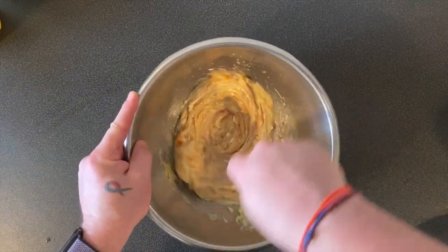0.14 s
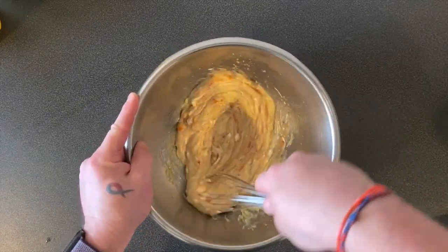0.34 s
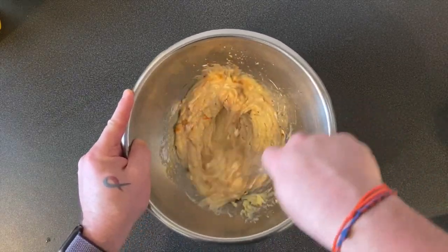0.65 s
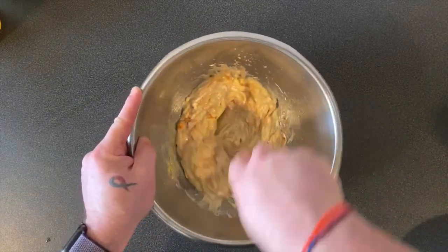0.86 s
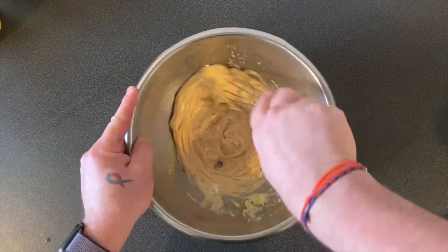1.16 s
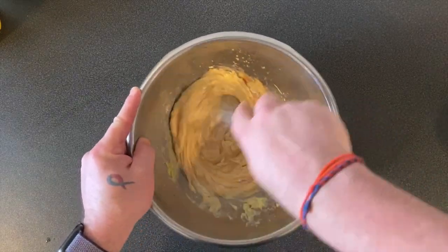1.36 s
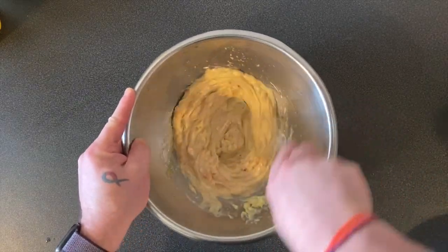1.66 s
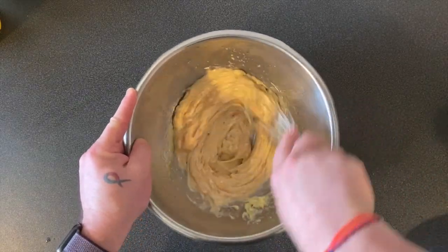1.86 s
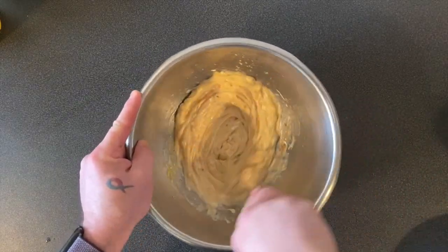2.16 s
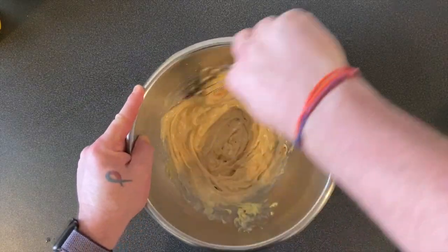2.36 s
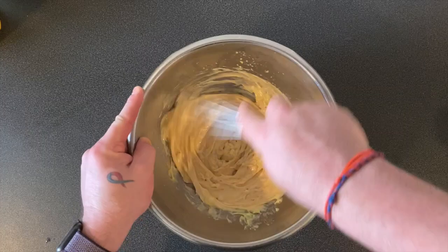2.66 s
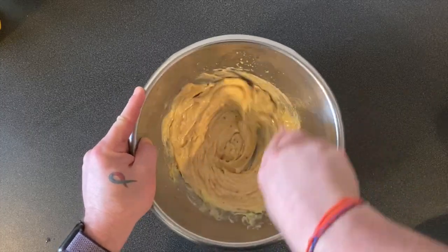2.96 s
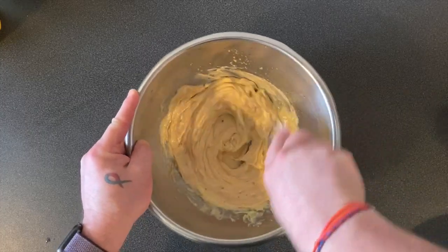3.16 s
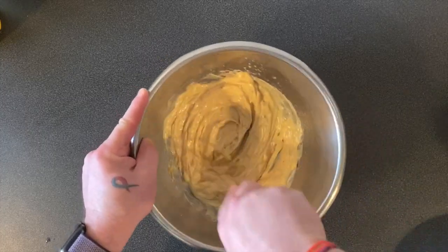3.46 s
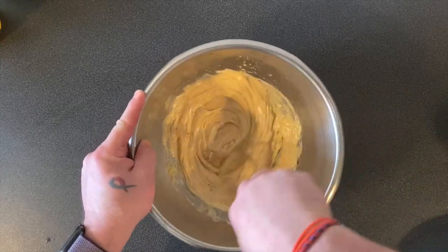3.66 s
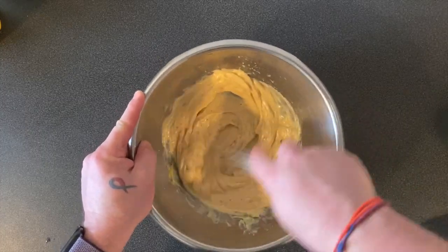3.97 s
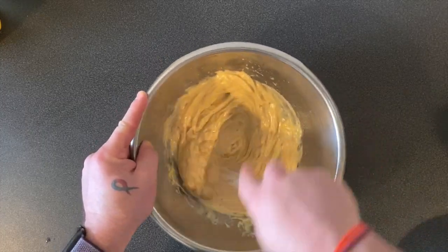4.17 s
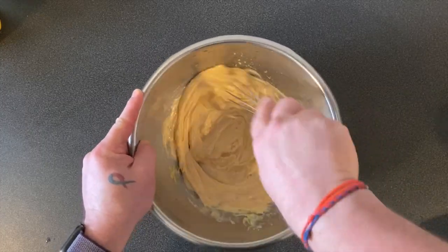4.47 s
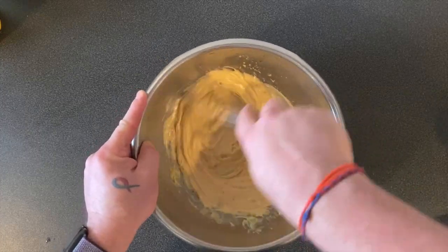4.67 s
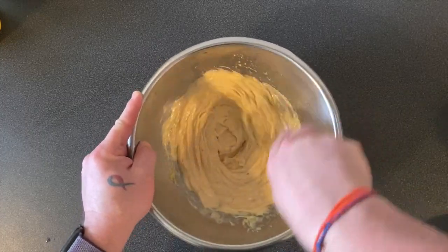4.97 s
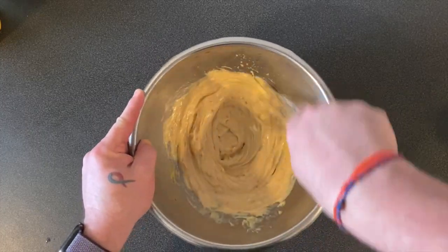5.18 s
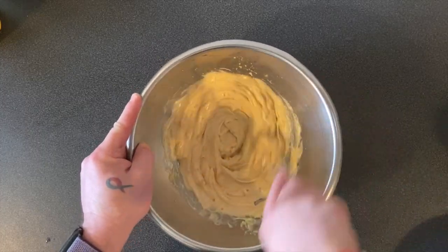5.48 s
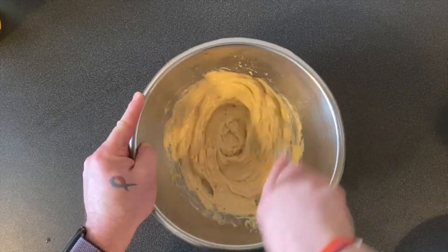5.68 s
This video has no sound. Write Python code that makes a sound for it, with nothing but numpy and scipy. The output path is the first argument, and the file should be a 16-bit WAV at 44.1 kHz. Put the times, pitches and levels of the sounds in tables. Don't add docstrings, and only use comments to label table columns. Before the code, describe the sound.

A wire whisk beats thick sauce in a thin stainless bowl, heard very close in stereo in a small kitchen with short soft reflections. It is under way from the start: bright, gritty swishes about four a second, each a burst of tiny wire clicks, a brief metallic scrape and a quick dip as the wires lift. Strokes are moderate until 1.5 seconds, then harder at 1.6 and 1.85. From about 2.3 to 2.6 only light scraping and small ticks remain; a sharp double clatter with a low thump hits at 2.7, followed by strong strokes at 2.95 and 3.15. Lighter grazes fill 3.4 to 3.8, then two hard strokes come at 4.0 and 4.25. Softer scrapes follow, one hard stroke at 5.15, and gentler ones until the cut near 5.8. Throughout, the damped bowl clanks shortly, sauce rubs dully, and the foot bumps the worktop.

```python
import sys
import numpy as np
from scipy import signal
from scipy.fft import rfft, irfft, next_fast_len
from scipy.io import wavfile

SR = 44100
rng = np.random.default_rng(int(sys.argv[2]) if len(sys.argv) > 2 else 0)


def master(y):
    cut = np.clip(np.atleast_2d(y).T, -1, 1)
    pcm = np.round(cut * 32767)
    wavfile.write(sys.argv[1], SR, pcm.astype(np.int16))


def field_ratio(decibels):
    return 10 ** (np.asarray(decibels, dtype=float) / 20)


N = 257014

# (time [s], wire pressure on the wall [dB], load on the worktop [dB])
STIRRING = [(0.0, -44.5, -51), (0.23, -39.5, -36), (0.47, -37.5, -59), (0.71, -68, -46.5),
            (0.99, -55.5, -49.5), (1.12, -35.5, -46), (1.64, -59.5, -44), (1.89, -47, -41.5),
            (2.38, -36.5, -52), (2.85, -47.5, -46.5), (2.98, -46, -42), (3.21, -40.5, -41.5),
            (3.78, -42.5, -46.5), (4.15, -54, -41), (4.43, -40, -48), (4.9, -44.5, -44),
            (5.2, -46.5, -49.5), (5.82, -43, -44.5)]
# (time [s], low-band lift [dB])
FLATNESS = [(0, 2.5), (0.35, -8), (0.8, 10), (1.15, 3), (1.5, 3), (2.0, 9), (2.5, -10), (2.85, 4), (3.3, 0),
            (3.55, 5.5), (3.9, 6.5), (4.3, 4), (4.6, 6), (5.0, 3), (5.35, 4), (5.6, 11), (5.83, 5.5)]
# (time [s], peak [dB], top octave re peak [dB], struck wall mode [Hz], chatter T60 [s])
LANDINGS = [(0.2192, -11, -7, 2700, 0.1), (0.4193, -9, -7, 7350, 0.09), (0.5511, -11, -7.5, 5630, 0.079),
            (0.7058, -15.5, -6, 7100, 0.17), (0.9427, -15, -3.5, 6460, 0.14),
            (1.1715, -13, -7, 6600, 0.067), (1.4064, -12.5, -5, 6700, 0.15),
            (1.6259, -6.5, -6.5, 6700, 0.13), (1.8481, -3.5, -7.5, 4080, 0.084),
            (2.077, -11.5, -4.5, 6800, 0.16), (2.229, -12.5, -12, 6800, 0.029),
            (2.3334, -18, -3, 6150, 0.4), (2.6903, -7, -1.5, 5700, 0.071), (2.9473, -5, -8.5, 6630, 0.1),
            (3.149, -2.5, -10, 5940, 0.09), (3.3702, -16.5, -8, 6600, 0.12), (3.8086, -14, -4, 6650, 0.19),
            (4.0179, -5, -6.5, 4800, 0.1), (4.237, -4.5, -6.5, 5230, 0.086), (4.703, -19, -3, 7200, 0.071),
            (4.927, -15, -5, 3150, 0.13), (5.1544, -5, -6, 6470, 0.12), (5.4306, -18, -4.5, 3280, 0.13),
            (5.653, -18, -2.5, 3200, 0.18)]
# (time [s], peak [dB], struck wall mode [Hz], chatter T60 [s])
LEADS = [(0.208, -21, 4950, 0.2), (0.41, -21.5, 2680, 0.12), (0.55, -42, 5700, 0.13),
         (0.694, -24.5, 3760, 0.13), (0.9264, -23.5, 7200, 0.071), (1.153, -30, 6540, 0.52),
         (1.382, -23.5, 6950, 0.13), (1.6161, -7.5, 4700, 0.041), (1.842, -12.5, 4200, 0.033),
         (2.066, -19, 5470, 0.033), (2.198, -22, 6260, 0.042), (2.309, -27.5, 6700, 0.42),
         (2.93, -17.5, 4100, 0.034), (3.14, -21, 3900, 0.094), (3.7868, -22.5, 5960, 0.13),
         (4.0108, -12.5, 4700, 0.088), (4.2293, -14.5, 5100, 0.052), (4.682, -28, 4370, 0.33),
         (4.906, -28, 4670, 0.24), (5.1447, -15, 5100, 0.058), (5.4125, -31, 7540, 1)]
# (time [s], peak [dB], struck wall mode [Hz], chatter T60 [s])
GRAZES = [(0.002, -17, 6700, 0.19), (0.346, -24.5, 6200, 0.12), (0.394, -25.5, 3900, 0.042),
          (0.542, -20, 4070, 0.06), (1.312, -28.5, 7460, 0.39), (1.854, -8.5, 6900, 0.1),
          (2.488, -27, 6700, 0.65), (2.548, -25, 6900, 0.12), (2.637, -27.5, 4200, 0.085),
          (2.697, -7.5, 800, 0.13), (2.71, -7.5, 6000, 0.12), (2.7277, -15.5, 6840, 0.23),
          (2.774, -29, 6000, 0.054), (3.3774, -32, 6260, 0.55), (3.44, -23, 2630, 0.18),
          (3.486, -17.5, 5270, 0.03), (3.594, -25.5, 3200, 0.12), (3.668, -26.5, 4900, 0.17),
          (3.716, -22, 5600, 0.054), (3.745, -21.5, 6100, 0.038), (4.016, -10.5, 1840, 0.035),
          (4.372, -26, 3820, 0.27), (4.483, -27, 3040, 0.058), (4.537, -29.5, 4200, 0.18),
          (4.7643, -31, 4800, 0.29), (4.79, -21.5, 3040, 0.079), (5.6111, -37, 5000, 0.26),
          (5.806, -24.5, 6500, 0.057)]
# (time [s], peak [dB])
TICKS = [(0.9951, -24), (1.1109, -26), (2.621, -16), (4.6693, -22), (5.6324, -20), (1.5744, -40),
         (2.896, -35.5), (3.3105, -28), (3.4187, -17), (3.5669, -37), (4.4165, -33), (4.4367, -27),
         (4.6024, -19), (4.8245, -30), (4.875, -25), (5.7484, -27), (5.7883, -38)]
# (frequency [Hz], density [dB per Hz])
SCRAPE_COLOUR = [(1500, -18), (2300, -22.5), (3150, -11.5), (3500, -12), (4200, -11.5), (5000, -7.5),
                 (5550, -10.5), (6300, -7.5), (6900, -9.5), (7600, -5.5), (9000, -5), (12000, -11),
                 (14800, -4), (16500, 0)]
SHEEN_MODES = [2585, 2833, 3170, 3740, 3910, 4280, 4470, 5120, 5270, 5600, 6140, 5840, 6450, 6100, 6530,
               6700, 6860, 6470, 7100]
# (frequency [Hz], level [dB], T60 [s])
WIRE_MODES = [(3074, -26, 0.018), (4700, -37.5, 0.0029), (5100, -17, 0.0029), (6150, -12.5, 0.003),
              (6700, -15, 0.003)]
# (frequency [Hz], level [dB], T60 [s])
CLANK_MODES = [(1829, 0, 0.057), (2690, -11, 0.031), (3146, -1.5, 0.025), (4200, -2, 0.014),
               (4950, -12, 0.014)]
# (time [s], peak [dB], thump re peak [dB], height up the wall [0-1], T60 [s])
KNOCKS = [(0, -29.5, 1.5, 1, 0.063), (0.213, -25.5, -6, 0.9, 0.053), (0.41, -31.5, -6, 0.6, 0.12),
          (0.549, -20, -11, 0.43, 0.048), (0.708, -22.5, -15, 0.4, 0.052), (0.931, -30.5, 0, 0.62, 0.12),
          (1.171, -26, -7.5, 0.6, 0.026), (1.408, -24, -8, 1, 0.015), (1.622, -23.5, -4.5, 0.92, 0.044),
          (1.852, -12, -18.5, 0, 0.026), (2.078, -21, -8.5, 0.58, 0.062), (2.312, -38.5, -2.5, 0.54, 0.11),
          (2.697, -25.5, 3.5, 0.63, 0.043), (2.949, -19.5, -9.5, 0.26, 0.06),
          (3.148, -14.5, -5.5, 0.5, 0.031), (3.372, -26, -5.5, 0.76, 0.033),
          (3.784, -20.5, -11, 0.64, 0.037), (4.013, -14.5, -11.5, 0.7, 0.037),
          (4.239, -14.5, -12, 0.9, 0.029), (4.708, -26, -3.5, 0.94, 0.023), (4.929, -28, 0, 0.97, 0.03),
          (5.154, -15.5, -11, 0.72, 0.042), (5.432, -24.5, -10, 0.58, 0.041), (5.654, -29, -1, 0.85, 0.05)]
# (time [s], peak [dB], thump re peak [dB], height up the wall [0-1])
NUDGES = [(0.999, -46, -19, 0.1), (1.071, -36.5, -6, 0.7), (1.339, -43, -13, 0.4), (1.603, -23, -17, 0.04),
          (2.001, -44, 0.3, 0.8), (2.23, -37.5, -25, 0.85), (2.895, -28.5, -22, 0.24),
          (3.225, -31.5, -5, 0.3), (3.264, -38, 0, 0), (3.314, -47, 12, 0.2), (3.42, -30.5, -7, 0.4),
          (3.595, -39.5, 0.5, 1), (3.658, -31, -7, 0.4), (3.809, -30.5, -2.5, 0.88), (4.376, -40, -18, 0.2),
          (4.489, -36.5, -1, 0.3), (4.539, -33, -4, 0.1), (4.792, -38.5, -12, 0.77), (5.748, -36, -24, 0.4)]
# (frequency [Hz], level [dB], T60 [s])
BOWL_MODES = [(328.2, -12.5, 0.18), (466, -13, 0.068), (555, -4, 0.088), (632.5, -5, 0.03),
              (651.4, -7, 0.058), (797, -19.5, 0.035)]
# (frequency [Hz], level [dB], T60 [s])
UPPER_WALL_MODES = [(930, -14, 0.19), (1107, 5.5, 0.038), (1160, 3, 0.09)]
# (frequency [Hz], level [dB], T60 [s])
RIM_MODES = [(1662, 2, 0.17), (1867, 6.5, 0.019), (1890, 8.5, 0.02), (2048, 2, 0.092)]
# (frequency [Hz], density [dB per Hz])
SAUCE_COLOUR = [(200, -50), (300, -3), (600, -7.5), (1000, -3.5), (1550, -10.5), (2000, -7), (3000, -11.5),
                (7000, -23)]
# (frequency [Hz], level [dB], T60 [s])
WORKTOP_MODES = [(58, -12, 0.15), (79.6, -7.5, 0.077), (100.2, -2.5, 0.08), (132, -1.5, 0.1),
                 (193.4, -3.5, 0.062), (228.6, -4, 0.12), (244.3, -10, 0.067)]
# (time [s], level
# [dB], frequency [Hz], length [s])
WALL_RINGS = [(0.006, -30.5, 1116, 0.019), (0.218, -30, 1138, 0.015), (0.222, -28, 1900, 0.012),
              (0.553, -31, 560, 0.035), (0.421, -37, 1870, 0.017), (0.551, -36, 1795, 0.012),
              (0.692, -41.5, 1900, 0.023), (0.71, -34, 558, 0.03), (0.932, -45, 944, 0.02),
              (0.995, -42, 555, 0.028), (1.295, -48.5, 930, 0.051), (1.407, -32, 1139, 0.017),
              (1.622, -32, 1080, 0.02), (1.634, -42, 2390, 0.034), (1.682, -48, 2050, 0.02),
              (1.846, -29.5, 1020, 0.012), (2.077, -29.5, 1860, 0.012), (2.231, -52, 2020, 0.022),
              (2.339, -48.5, 1180, 0.051), (2.704, -56, 1940, 0.025), (2.774, -52, 780, 0.035),
              (2.846, -48, 1740, 0.024), (2.945, -32.5, 1105, 0.027), (3.011, -49, 1140, 0.044),
              (3.151, -27.5, 1127, 0.0096), (3.277, -48, 960, 0.048), (3.686, -47, 1880, 0.037),
              (3.718, -45, 930, 0.026), (4.017, -25, 1805, 0.012), (4.24, -33, 560, 0.035),
              (4.238, -30, 1144, 0.015), (4.255, -45, 1160, 0.093), (4.352, -48, 930, 0.04),
              (4.372, -44, 1810, 0.026), (4.57, -48, 1700, 0.018), (4.927, -32, 1155, 0.015),
              (4.94, -45.5, 1160, 0.083), (5.154, -25.5, 1142, 0.015), (5.168, -39.5, 1160, 0.084),
              (5.655, -32, 1140, 0.013), (5.665, -48, 2060, 0.045),
              (0.02, -50, 6890, 0.044), (0.056, -49, 5640, 0.03), (0.579, -45, 4360, 0.044),
          (0.708, -29, 6700, 0.019), (1.169, -36, 3230, 0.017), (1.622, -23, 3120, 0.013),
          (1.626, -28, 3720, 0.013), (1.67, -36, 6740, 0.024), (1.674, -44, 5150, 0.014),
          (2.083, -42, 6700, 0.024), (2.097, -49, 5080, 0.036), (2.229, -47, 4400, 0.012),
          (2.335, -43, 5190, 0.016), (2.339, -39, 6850, 0.018), (2.409, -48, 4350, 0.032),
          (2.45, -54, 2630, 0.076), (2.494, -62, 2610, 0.048), (2.56, -45, 6000, 0.041),
          (2.636, -43, 3880, 0.012), (2.692, -21, 4930, 0.018), (2.692, -23, 6070, 0.038),
          (2.71, -38, 3170, 0.035), (2.772, -33, 3700, 0.013), (2.951, -36, 6160, 0.018),
          (2.951, -24, 6650, 0.012), (3.089, -56, 2600, 0.03), (3.147, -27, 4090, 0.016),
          (3.161, -38, 6290, 0.037), (3.223, -45, 6240, 0.024), (3.293, -50, 2610, 0.032),
          (3.39, -35.5, 6140, 0.025), (3.664, -41.5, 2840, 0.02), (4.015, -27, 4950, 0.014),
          (4.292, -49, 5920, 0.044), (4.41, -35.5, 5840, 0.014), (4.484, -49, 4270, 0.02),
          (4.55, -50, 2600, 0.075), (4.705, -46, 3100, 0.032), (4.765, -44, 4050, 0.03),
          (4.927, -39, 3210, 0.014), (4.935, -38, 4890, 0.022), (5.051, -53, 3650, 0.032),
          (5.088, -62, 3150, 0.057), (5.428, -38.5, 4600, 0.016), (5.515, -44, 6250, 0.034),
          (5.609, -58, 5100, 0.05), (5.653, -39, 3120, 0.011)]
# (time [s], peak [dB], favoured pitch [Hz])
BUMPS = [(0.009, -30, 125), (0.183, -27, 125), (0.21, -18.5, 110), (0.406, -29, 136), (0.55, -36, 138),
         (0.699, -26.5, 188), (0.82, -29, 127), (0.94, -21, 111), (1.058, -24, 142), (1.173, -30, 185.4),
         (1.389, -19, 128), (1.572, -26, 120), (1.62, -17, 122), (1.739, -27, 93), (1.854, -12, 219.4),
         (1.995, -25, 161), (2.079, -20, 209), (2.7, -10.5, 132.5), (2.947, -15, 138), (3.15, -15, 125),
         (3.224, -26, 149), (3.261, -20.5, 98), (3.368, -32, 129), (3.429, -27, 183), (3.481, -24, 183),
         (3.798, -20.5, 144), (3.978, -28, 124), (4.017, -18, 197), (4.131, -30, 122), (4.239, -17, 136),
         (4.485, -26.5, 134), (4.542, -31, 210), (4.708, -17.5, 198), (4.917, -19.5, 130),
         (5.151, -14, 145.5), (5.431, -25, 199), (5.615, -23, 113), (5.652, -30, 141), (5.713, -30, 139)]
# (frequency [Hz], lean to the left [dB]; left sits roughly twice this above right)
PORT_BALANCE = [(60, 1), (110, 0), (200, 2), (380, -0.5), (700, -0.5), (1290, -1.5), (2380, -0.5),
                (4400, -5.5), (8120, -3), (15000, 6)]
# (frequency [Hz], side minus mid [dB])
KITCHEN_WIDTH = [(60, -8), (110, -15), (200, -4), (380, -4), (700, 4), (1290, 5), (2380, -1.5), (4400, -8),
                 (8120, -21), (15000, -96)]


def rms_one(x):
    return x / np.sqrt(np.mean(x ** 2) + 1e-20)


def at_hz(points, hz):
    table = np.array(points, float)
    return np.interp(np.log(hz + 1), np.log(table[:, 0] + 1), table[:, 1])


def in_time(rows):
    s, *columns = np.transpose(rows)
    return [np.interp(np.arange(N) / SR, s, column) for column in columns]


def shaped(x, response):
    size = next_fast_len(N + SR // 3)
    hz = np.arange(size // 2 + 1) * SR / size
    return irfft(rfft(x, size) * response(hz), size)[..., :N]


def ring(force, hz, t60):
    radius = field_ratio(-60 / (max(t60, .005) * SR))
    angle = 2 * np.pi * hz / SR
    gain = np.sin(angle) * 2 * np.sqrt(1 - radius)
    return signal.lfilter([0, gain], [1, -2 * radius * np.cos(angle), radius * radius], force)


def wander(spread_db, per_s):
    count = round(per_s * N / SR) + 2
    gains = field_ratio(spread_db * rng.standard_normal(count))
    return np.interp(np.arange(N), np.linspace(0, N, count), gains)


def contacts(per_s, spread_db, size=N):
    strength = field_ratio(spread_db * np.minimum(rng.exponential(1, size), 4))
    sizes = strength * rng.choice([-1, 1], size)
    return rms_one(sizes * (rng.random(size) < per_s / SR) + 1e-9)


def pressure(drag_db, rows, blow_db, rise_s, stretch, tail_db):
    step = 8
    power = field_ratio(drag_db[::step]) ** 2
    t = np.arange(0, SR // 2, step) / SR
    for (s, *_, t60), db in zip(rows, blow_db):
        i = max(round(s * SR / step), 0)
        chatter = field_ratio(-60 * t / np.clip(t60 * stretch, .01, 1))
        slide = field_ratio(tail_db - 60 * t / np.clip(4.73 * t60, .02, 2))
        blow = field_ratio(db) * (1 - np.exp(-t / rise_s)) * (chatter + slide)
        power[i:i + len(t)] += (blow ** 2)[:len(power) - i]
    return np.interp(np.arange(N) / step, np.arange(len(power)), np.sqrt(power))


def strikes(rows, blow_db, width_s, late_s):
    clicks = np.zeros(N + SR)
    clicks[((np.array(rows)[:, 0] + late_s) * SR).astype(int)] = field_ratio(blow_db)
    shape = np.hanning(round(width_s * SR) + 3)
    return signal.fftconvolve(clicks[:N], shape / shape.sum())[:N]


def wires():
    scrape_db, top_db = stirring()[:2]
    rows = wire_rows()
    peak_db, rel_db = np.array(rows)[:, 1:3].T
    judder = wander(1.55, per_s=200)
    snag_db = snags()
    push = judder * pressure(scrape_db + snag_db - 6.0, rows, peak_db - 10.5,
                             rise_s=0.0015, stretch=0.28, tail_db=-10.5)
    top = judder * pressure(top_db + 0.46 * snag_db + 0.62, rows, peak_db + rel_db - 3.5,
                            rise_s=0.00037, stretch=0.36, tail_db=-12.5)
    rising_db = lift(settle_s=.001)
    push = push * field_ratio(-0.2 * rising_db)
    top = top * field_ratio(-0.46 * rising_db)
    direct = grit(push, top, patchy_db=3.5) + field_ratio(1.0) * sheen(push)
    direct = direct + field_ratio(-4.5) * struck_modes(rows) + sing(push)
    direct = direct + clank(rows) + crackle(push)
    return direct, rasp() * push


def wire_rows():
    landings = [(s, db, top_db, hz, -16.5, t60) for s, db, top_db, hz, t60 in LANDINGS]
    leads = [(s, db, -1, hz, -15, t60) for s, db, hz, t60 in LEADS]
    grazes = [(s, db, -6, hz, -11, t60) for s, db, hz, t60 in GRAZES]
    ticks = [(s, db, -5, 9800, -20, 0.039) for s, db in TICKS]
    return landings + leads + grazes + ticks


def stirring():
    press_db, load_db = in_time(STIRRING)
    lift_db = lift(settle_s=0.06)
    from_wires, bowl_feels_lift = 0.26, 0.18
    hum_db = from_wires * press_db + (1 - from_wires) * load_db
    return (press_db + 6 - lift_db,
            press_db + 3 - 1.06 * lift_db,
            hum_db - 2.5 - bowl_feels_lift * lift_db,
            load_db + 4.5 - bowl_feels_lift * lift_db)


def lift(settle_s):
    rise_s, base_db, per_db, least_db = 0.079, 30.5, 1.8, 11
    t = np.arange(0, N + 16, 16) / SR
    lift_db = np.zeros(len(t))
    for s, db, *_ in LANDINGS:
        leading = [lead[0] for lead in LEADS if s - .03 < lead[0] < s]
        down = min([s] + leading) - .002
        depth = max(base_db + per_db * db, least_db)
        dip = np.interp(t, [down - rise_s, down, down + settle_s], [0, depth, 0])
        lift_db = np.maximum(lift_db, dip)
    return np.interp(np.arange(N) / SR, t, lift_db)


def snags():
    per_s, jolt_db, decay_s = 45, 5, 0.004
    chance = per_s * wander(6.0, per_s=7) / SR
    caught = (rng.random(N) < chance) * rng.exponential(1, N)
    jolts = signal.lfilter([1], [1, -np.exp(-1 / (decay_s * SR))], caught + 1e-18)
    slack_db = 20 * np.log10(wander(1.8, per_s=33))
    return jolt_db * np.minimum(jolts, 1.4) + slack_db - 2.0


def rasp():
    touches = contacts(10000, spread_db=3.1)
    return rms_one(shaped(touches, lambda hz: field_ratio(at_hz(SCRAPE_COLOUR, hz))))


def grit(push, top_push, patchy_db):
    rough, out = rasp(), 0
    edges = [*np.geomspace(1500, 8200, 9), 11500, 19000]
    flat_db, = in_time(FLATNESS)
    for k, (low, high) in enumerate(zip(edges, edges[1:])):
        sos = signal.butter(2, [low, high], "band", fs=SR, output="sos")
        band = (-1) ** k * signal.sosfilt(sos, rough)
        if high < 9000:
            patches = wander(0.096 * patchy_db, per_s=26) * wander(patchy_db, per_s=37)
            lean = field_ratio(flat_db * np.clip(np.log2(5000 / low), 0, 1))
            out = out + band * patches * lean * push
        else:
            out = out + band * wander(1.8, per_s=59) * top_push
    return out


def sheen(push):
    ticks = contacts(1300, spread_db=3.5) * push
    dealt = rng.integers(0, len(SHEEN_MODES), N)
    out = 0
    for k, hz in enumerate(SHEEN_MODES):
        glint = ring(ticks * (dealt == k) + 1e-18, hz, t60=0.059)
        out = out + glint * field_ratio(at_hz(SCRAPE_COLOUR, hz))
    return out


def struck_modes(rows):
    out, t = np.zeros(N), np.arange(SR // 8) / SR
    for s, db, _, hz, rel_db, t60 in rows:
        i = max(round(s * SR), 0)
        fall = field_ratio(db + rel_db - 60 * t / np.clip(1.16 * t60, .01, 1))
        force = rng.standard_normal(len(t)) * fall
        out[i:i + len(t)] += ring(force, hz, t60=0.0092)[:N - i]
    return out


def sing(push):
    force = contacts(6000, spread_db=0.0) * push
    return sum(field_ratio(db) * ring(force, hz, t60) for hz, db, t60 in WIRE_MODES)


def clank(rows):
    s, db, _, struck_hz = np.array(rows)[:, :4].T
    out = 0
    for k, (hz, mode_db, t60) in enumerate(CLANK_MODES):
        octaves_off = np.abs(np.log2(struck_hz / hz))
        raps = strikes(rows, db + mode_db + 4.5 - 8.3 * octaves_off, width_s=0.00005, late_s=0.0025)
        out = out + (-1) ** k * ring(raps, hz, t60)
    return out


def crackle(push):
    snaps = contacts(170, spread_db=3.0) * field_ratio(-11) * wander(4.0, per_s=12)
    coloured = rms_one(shaped(snaps, lambda hz: field_ratio(at_hz(SCRAPE_COLOUR, hz))))
    return coloured * field_ratio(-7.5) * push


def bowl():
    hum_db, rumble_db = stirring()[2:]
    rows = knock_rows()
    peak_db, thump_db, upper_db, rim_db = np.array(rows)[:, 1:5].T
    wall = pressure(hum_db - 2.5, rows, peak_db - 1.0, rise_s=0.0017, stretch=0.7, tail_db=-10.0)
    upper = pressure(hum_db - 23.0, rows, peak_db + upper_db - 4.5,
                     rise_s=0.0016, stretch=0.61, tail_db=-11.0)
    rim = pressure(hum_db + in_time(FLATNESS)[0] - 10.0, rows, peak_db + rim_db + 0.96,
                   rise_s=0.0025, stretch=0.2, tail_db=-7.5)
    base = pressure(rumble_db + 2.0, rows, peak_db + thump_db - 0.5,
                    rise_s=0.00037, stretch=0.72, tail_db=1.0)
    base = base * wander(2.5, per_s=28)
    wall_knock = strikes(rows, peak_db + 14.5, 0.0017, 0.00291)
    upper_knock = strikes(rows, peak_db + upper_db + 12.5, 0.00056, 0.00292)
    thump = strikes(rows, peak_db + thump_db + 31.0, 0.00086, 0.0026)
    out = body(BOWL_MODES, wall, wall_knock, 2500, wander_db=1.15)
    out = out + body(UPPER_WALL_MODES, upper, upper_knock, 2500, wander_db=1.5)
    out = out + field_ratio(-3.0) * body(RIM_MODES, rim, 0, 2500, wander_db=4.0)
    out = out + field_ratio(0.5) * sauce_rub() * (0.062 * wall + 0.34 * upper + rim)
    return out + body(WORKTOP_MODES, base, thump, 2500, wander_db=0.84)


def knock_rows():
    nudges = [(*row, 0.074) for row in NUDGES]
    return [(s, db, thump_db, -20.5 + 25.5 * height, -20.5 + 5.5 * height, t60)
            for s, db, thump_db, height, t60 in KNOCKS + nudges]


def body(modes, push, struck, per_s, wander_db):
    out, force = 0, contacts(per_s, spread_db=2.5) * push + struck
    for k, (hz, db, t60) in enumerate(modes):
        favour = field_ratio(db) * wander(wander_db, per_s=9)
        out = out + (-1) ** k * ring(force * favour, hz, t60)
    return out / np.sqrt(np.sum(field_ratio(np.array(modes)[:, 1]) ** 2))


def sauce_rub():
    rub = shaped(contacts(4000, spread_db=1.0), lambda hz: field_ratio(at_hz(SAUCE_COLOUR, hz)))
    return rms_one(rub) * wander(3.34, per_s=73)


def lone_rings():
    rings = [(s, db + 6.5, hz, 3.22 * length) for s, db, hz, length in WALL_RINGS]
    bumps = [(s, db - 2, hz, 0.13) for s, db, hz in BUMPS]
    roughness = wander(3.2, per_s=260)
    return lone_modes(rings, rise_s=0.002) * roughness + lone_modes(bumps, rise_s=0.0024)


def lone_modes(rows, rise_s):
    out, t = np.zeros(N + SR), np.arange(SR // 4) / SR
    for s, db, hz, t60 in rows:
        i = max(round(s * SR), 0)
        envelope = field_ratio(db - 60 * t / max(t60, .01)) * (1 - np.exp(-t / rise_s))
        out[i:i + len(t)] += envelope * np.sin(2 * np.pi * hz * t)
    return out[:N]


def kitchen(x):
    t60_s = 0.16
    lags = rng.uniform(0.0061, 0.028, (2, 8, 1))

    def combs(hz):
        loop = field_ratio(-60 * lags / t60_s) * np.exp(-2j * np.pi * hz * lags)
        return np.sum(loop / (1 - loop), axis=1) / 3
    return shaped(x, combs)


def scene():
    port_lag_s, joined_hz = 4.5e-5, 8450
    bright, bright_apart = wires()
    near = bright + bowl() + lone_rings()
    common, differing = kitchen(near)

    def apart(hz):
        return 1 / (1 + (hz / joined_hz) ** 60) + .075

    def lead(hz):
        level = np.log(field_ratio(at_hz(PORT_BALANCE, hz)))
        phase = np.pi * np.minimum(hz, 6500) * port_lag_s
        return np.tanh(level - 1j * phase)
    mid = near + field_ratio(-9.5) * common
    side = shaped(mid, lambda hz: 0.8 * lead(hz) * apart(hz))
    side = side + shaped(differing, lambda hz: field_ratio(at_hz(KITCHEN_WIDTH, hz) - 5.5) * apart(hz))
    side = side + field_ratio(4.5) * shaped(bright_apart, apart)
    return np.array([mid + side, mid - side])


def top_cut(x):
    return signal.sosfilt(signal.butter(12, 16820, fs=SR, output="sos"), x)


def record(dry):
    rounded = 1.1 * np.tanh(dry / 1.1)
    mix = signal.sosfilt(signal.butter(4, 54, "high", fs=SR, output="sos"), rounded)
    mix = signal.sosfilt(signal.ellip(10, .5, 60, 15750, fs=SR, output="sos"), mix)
    return top_cut(mix)


dry = scene()
out = record(dry)
master(out)
```